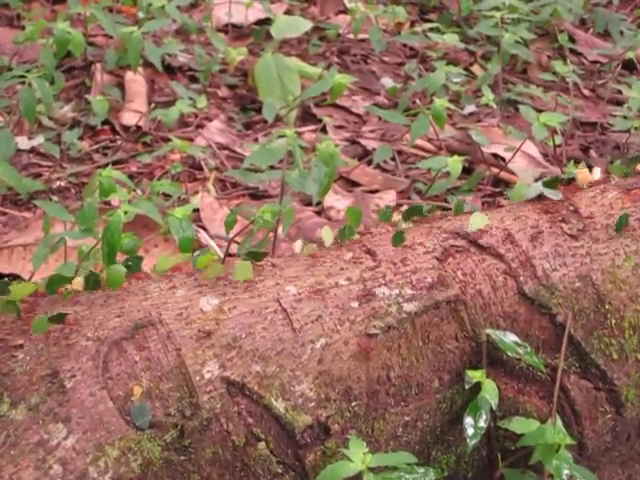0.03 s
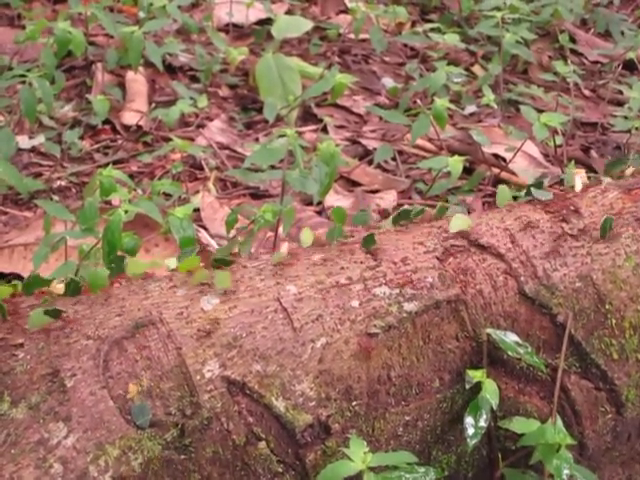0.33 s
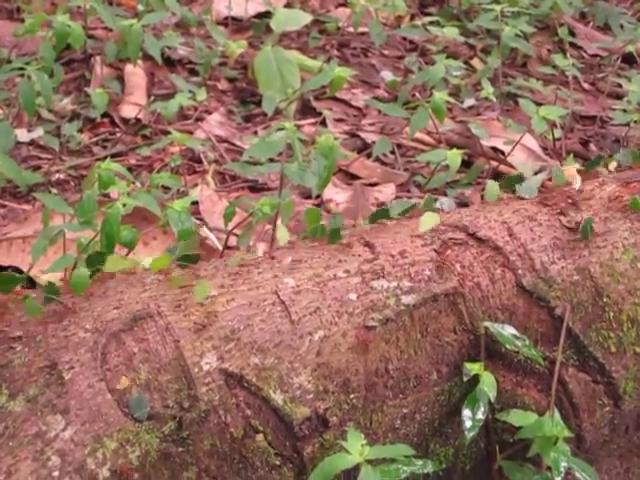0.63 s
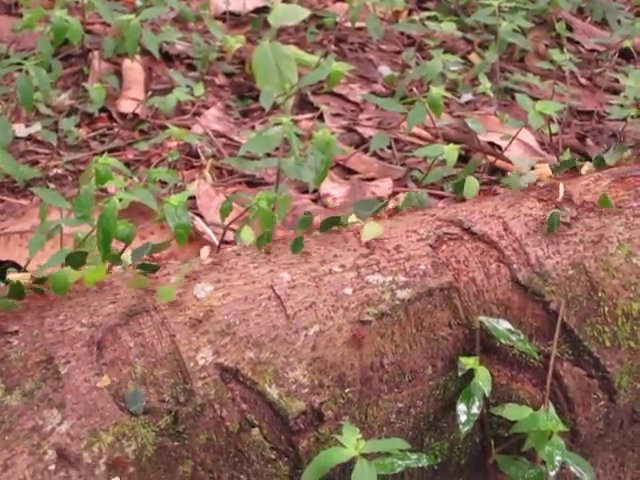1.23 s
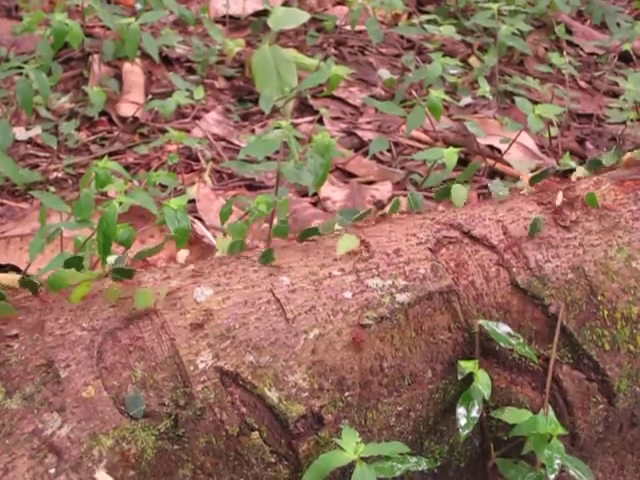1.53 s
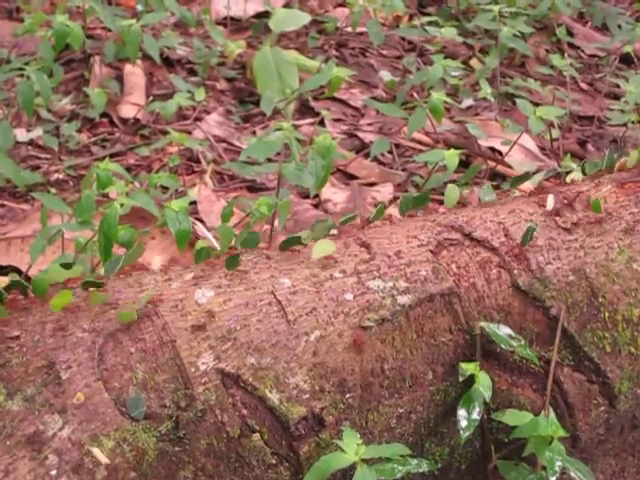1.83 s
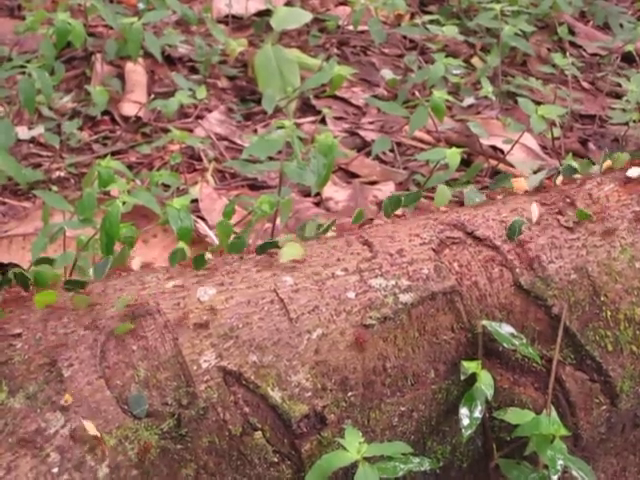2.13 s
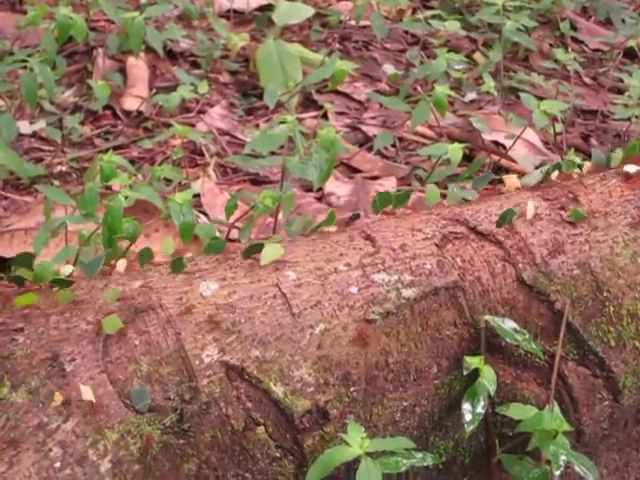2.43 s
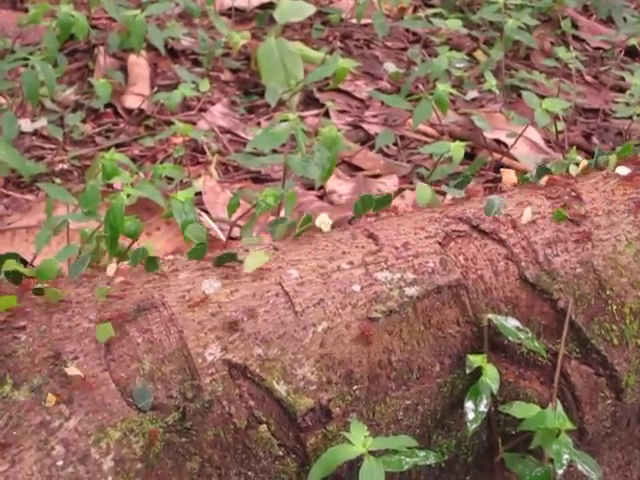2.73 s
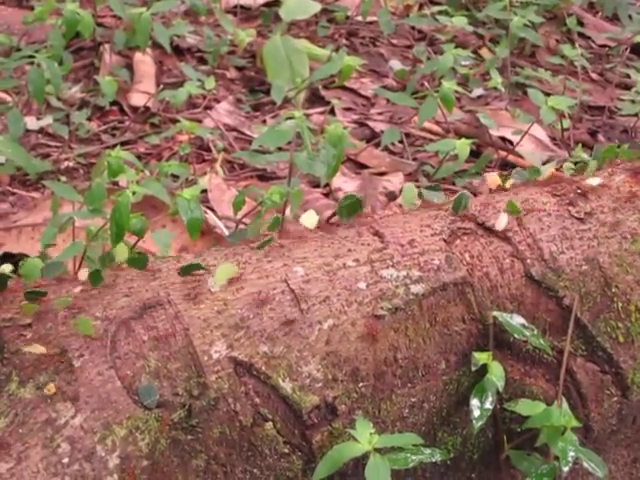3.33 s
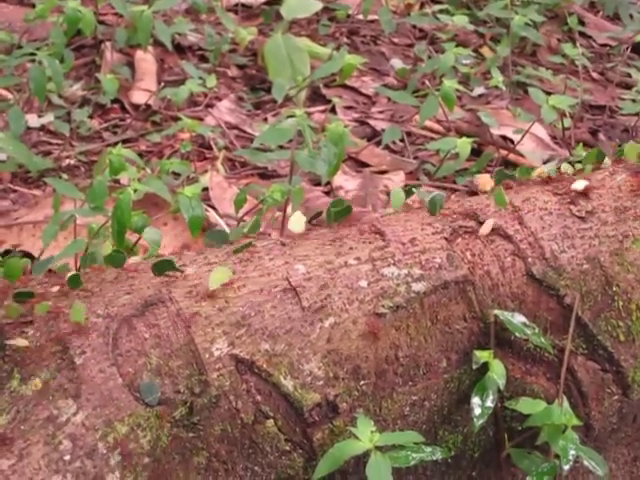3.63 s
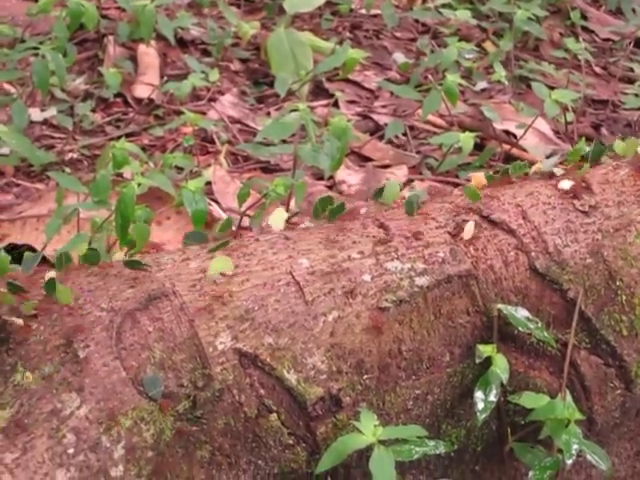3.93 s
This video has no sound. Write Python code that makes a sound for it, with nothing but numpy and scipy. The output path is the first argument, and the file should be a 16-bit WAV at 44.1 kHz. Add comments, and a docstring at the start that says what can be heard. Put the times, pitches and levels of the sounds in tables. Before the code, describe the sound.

A cricket trills three times over quiet forest hiss, and a fainter one answers.

```python
"""Crickets on a forest floor

A cricket trills three times in the leaf litter; each wing stroke is one short falling whistle.
A second cricket answers farther off, and a few tiny ticks come from the dry leaves. Behind them
lie soft forest hiss, far traffic, a distant motor, a low hum and a camera's faint high whine."""
import sys
import numpy as np
from scipy import signal
from scipy.fft import rfft, irfft
from scipy.io import wavfile

SR = 44100
rng = np.random.default_rng(int(sys.argv[2]) if len(sys.argv) > 2 else 0)


def transcribe(signal):
    """Save signal, clipped to [-1, 1], as a 16-bit WAV file at the path in sys.argv[1]."""
    frames = np.atleast_2d(signal).T
    limited = np.clip(frames, -1, 1)
    pcm = np.round(limited * 32767).astype(np.int16)
    wavfile.write(sys.argv[1], SR, pcm)


N = 176400
TIME = np.arange(N) / SR
FREQS = np.arange(N // 2 + 1) * SR / N


def from_db(db):
    """Turn decibels into a number to multiply by."""
    return 10 ** (np.asarray(db) / 20)

def rms_one(x):
    """Scale to an average strength (rms) of one."""
    return x / np.sqrt(np.mean(x ** 2) + 1e-20)

def in_time(rows):
    """Join a table's rows with straight lines, one curve per column after the time."""
    times, *columns = np.transpose(rows)
    return [np.interp(TIME, times, column) for column in columns]

def coloured_noise(spectrum):
    """Noise with its lows and highs set by a table."""
    hz, db = np.transpose(spectrum)
    curve_db = np.interp(np.log(np.maximum(FREQS, 1)), np.log(hz), db)
    gain = from_db(curve_db) * np.sqrt(SR / 2)
    return irfft(rfft(rng.standard_normal(N)) * gain, N)

def noise_around(centre_hz, width_hz):
    """Noise near one pitch; around zero it is a slow drift."""
    bell = np.exp(-.5 * ((FREQS - centre_hz) / width_hz) ** 2)
    return rms_one(irfft(rfft(rng.standard_normal(N)) * bell, N))

def band(x, edges_hz):
    """Keep only the sound between two frequencies."""
    return signal.sosfilt(signal.butter(4, edges_hz, "band", fs=SR, output="sos"), x + 1e-18)


# The hiss from low to high: f/Hz, level/dB per Hz
HISS_SPECTRUM = [(20, -87), (31, -73), (45, -80), (250, -78), (500, -80), (1000, -83.5), (2000, -88.5),
                 (3200, -92), (4800, -97.5), (5600, -100), (6400, -103), (7300, -104.3), (9000, -104.3),
                 (12000, -106.8), (15500, -110)]

def forest_air():
    """Even hiss and crickets blurred by distance, with a dip in the treble."""
    hiss = coloured_noise(HISS_SPECTRUM)
    chorus = from_db(-68.5) * noise_around(centre_hz=5420, width_hz=260)
    dip_hz, dip_width_hz = 6440, 1950
    dip = signal.iirnotch(dip_hz, dip_hz / dip_width_hz, fs=SR)
    return signal.lfilter(*dip, hiss + chorus)

def camera_whine(low_hz=7868, high_hz=12600, frames_per_s=29.97):
    """A camera gives off two thin tones; the lower one restarts with every frame."""
    frame_time = TIME % (1 / frames_per_s)
    low = band(np.sin(2 * np.pi * low_hz * frame_time), edges_hz=(7650, 8100))
    high = np.sin(2 * np.pi * high_hz * TIME)
    return from_db(-73) * rms_one(low) + from_db(-81) * rms_one(high)


# The rumble from low to high: f/Hz, relative level/dB
RUMBLE_SPECTRUM = [(45, -38), (68, -0.5), (82, 9), (92, 2), (103, 12), (120, 1.5), (136, 6), (156, 3),
                   (176, 2), (198, -0.5), (230, -37), (400, -41)]
# How loud the rumble is: t/s, level/dB
RUMBLE_LOUDNESS = [(0, -50), (.5, -50.5), (1.1, -52.5), (1.5, -51), (1.9, -48.5), (2.5, -52.5),
                   (3.1, -51.5), (4, -51.5)]

def road_rumble():
    """A distant road makes a deep noise that gently rises and falls."""
    db, = in_time(RUMBLE_LOUDNESS)
    return from_db(db) * rms_one(coloured_noise(RUMBLE_SPECTRUM))


# Traffic tones that swell and fade: loudest at t/s, half length/s, f/Hz, level/dB
TRAFFIC_TONES = [(0.898, 0.31, 333, -56.5), (1.27, 0.07, 331, -56.5), (2.052, 0.71, 200, -57.5),
                 (2.048, 0.28, 123, -55.5), (2.85, 0.41, 477, -61.5), (3.345, .3, 556, -60),
                 (3.952, 0.16, 287, -59.5)]
WAVER_DB, WAVER_HZ = 1.5, .75  # drift in level and pitch, for traffic and motor

def far_traffic():
    """Single wavering tones of far traffic come through the trees for a moment."""
    out = np.zeros(N)
    for peak_s, half_length, hz, db in TRAFFIC_TONES:
        cycles = np.cumsum(hz + WAVER_HZ * noise_around(0, 2.64)) / SR
        gain = from_db(db + WAVER_DB * noise_around(0, 2.6))
        swell = np.exp(-((TIME - peak_s) / half_length) ** 2)
        out += gain * swell * np.sin(2 * np.pi * cycles)
    return np.sqrt(2) * out


# How the hum changes: t/s, f/Hz, level/dB
HUM_CURVE = [(0, 109, -50), (.35, 106, -54.5), (.75, 103, -50.5), (1.5, 104, -58), (2.3, 101, -77),
             (2.8, 101, -53), (3.6, 101, -57), (4, 98, -58)]

def low_hum(waver_db=2):
    """One low tone slowly sinks, wavering on its way through the trees."""
    hz, db = in_time(HUM_CURVE)
    gain = from_db(db + waver_db * noise_around(0, 8.2))
    return np.sqrt(2) * gain * np.sin(2 * np.pi * np.cumsum(hz) / SR)


# How the motor's drone changes: t/s, f/Hz, level/dB
MOTOR_CURVE = [(0, 165, -74), (.13, 165.4, -63), (.19, 166, -46.5), (.9, 166.5, -48), (1.1, 166, -53),
               (1.33, 166.8, -48), (1.47, 165, -58.5), (1.7, 167.5, -45.5), (2.0, 168.5, -51),
               (2.25, 166, -52), (2.6, 156, -52), (3.5, 159, -52.5), (4, 157, -62)]
# The tones in the drone: multiple of the pitch, added level/dB
MOTOR_TONES = [(.5, -11.5), (1, -2), (1.5, -20), (2, -20)]

def distant_motor():
    """A motor drones with four low tones, each wavering on its way through the trees."""
    hz, db = in_time(MOTOR_CURVE)
    cycles = np.cumsum(hz + WAVER_HZ * noise_around(0, 3.7)) / SR
    out = np.zeros(N)
    for multiple, tone_db in MOTOR_TONES:
        gain = from_db(db + tone_db + WAVER_DB * noise_around(0, 3.1))
        out += gain * np.sin(2 * np.pi * multiple * cycles)
    return np.sqrt(2) * out


# Ticks in the dry leaves: t/s, snap level/dB, knock level/dB
LEAF_TICKS = [(.198, -38, -42), (.687, -40, -50), (1.0015, -46, -62), (1.423, -52, -63), (2.191, -44, -57),
              (3.1925, -37, -37), (3.8785, -53, -66)]

def leaf_ticks():
    """A dry leaf ticks with two bursts of noise: a bright snap and a duller, longer knock."""
    times, snap_db, knock_db = np.transpose(LEAF_TICKS)

    def bursts(levels, edges_hz, decay_s):
        fades = sum(from_db(db) * (TIME >= start) * np.exp(-np.abs(TIME - start) / decay_s)
                    for start, db in zip(times, levels))
        boost = np.sqrt(SR / 2 / (edges_hz[1] - edges_hz[0]))  # makes up for what the filter removes
        return boost * band(fades * rng.standard_normal(N), edges_hz)

    snaps = bursts(snap_db, edges_hz=(3530, 5600), decay_s=.00075)
    knocks = bursts(knock_db, edges_hz=(850, 1900), decay_s=.002)
    return snaps + knocks

def among_leaves(x, scatter_db, bounce_s=.005, bounce_db=-24, fade_s=.14):
    """Sound arrives directly, bounces off the ground and scatters from leaves and trunks."""
    t = TIME[:SR // 2]
    tail = rng.standard_normal(len(t)) * from_db(-60 * t / fade_s) * (t > bounce_s)
    scatter = signal.fftconvolve(x, tail / np.linalg.norm(tail))[:N]
    bounce = np.r_[np.zeros(int(bounce_s * SR)), x][:N]
    return x + from_db(bounce_db) * bounce + from_db(scatter_db) * scatter

def wing_strokes(trills, counts, pitch_hz):
    """Each stroke scrapes the wing's row of tiny teeth, making a falling whistle and a faint rasp."""
    rise_s, stop_s = .0039, .0018  # a gentle swell and an abrupt stop
    fall_hz_per_s, bend_hz_per_s2 = 135000, 7800000  # the pitch falls ever faster
    slowing_s = .000052  # each gap is this much longer than the last
    cold_db, cold_hz, warm_up_strokes = 4.5, 45.5, 1.3  # a trill starts softer and lower
    spread_db, spread_hz, rasp_spread_db = .2, 9, 5.5  # no two strokes are alike
    octave_db, rasp_db = -33.5, -34.5  # compared with the whistle
    whistle, scraping = np.zeros(N), np.zeros(N)
    for (start, db, spacing), count in zip(trills, counts):
        for k, (loud, sharp, phase, scrape) in enumerate(rng.standard_normal((count, 4))):
            peak_s = start + k * spacing + slowing_s * k * (k - 1) / 2
            span = np.abs(TIME - peak_s) < spacing
            t = TIME[span] - peak_s
            cold = np.exp(-k / warm_up_strokes)
            swell = np.exp(-np.where(t < 0, np.abs(t / rise_s) ** 1.82, np.abs(t / stop_s) ** 1.5))
            swell *= from_db(db - cold_db * cold + spread_db * loud)
            stroke_hz = pitch_hz - cold_hz * cold + spread_hz * sharp
            hz = stroke_hz - fall_hz_per_s * t - bend_hz_per_s2 * t * t
            angle = 2 * np.pi * (np.cumsum(hz) / SR + phase)
            whistle[span] += swell * (np.sin(angle) + from_db(octave_db) * np.sin(2 * angle))
            scraping[span] += swell * (1 - cold) * from_db(rasp_spread_db * scrape)
    rasp = rms_one(band(rng.standard_normal(N), edges_hz=(5540, 6960)))
    return whistle + from_db(rasp_db) * scraping * rasp


# The far cricket's trills: first stroke t/s, peak level/dB, first gap between strokes/s
ANSWERS = [(.2015, -55.5, .0222), (1.572, -58, .0224), (3.1525, -55.5, .0227)]
# Wing strokes in each answer: count
ANSWER_STROKES = [12, 12, 13]

def far_cricket():
    """A faint cricket farther off; more of its sound arrives scattered."""
    return among_leaves(wing_strokes(ANSWERS, ANSWER_STROKES, pitch_hz=5400), scatter_db=-10)


# The near cricket's trills: first stroke t/s, peak level/dB, first gap between strokes/s
CALLS = [(.4638, -34, .02177), (1.6507, -34, .02181), (2.884, -34, .02176)]
# Wing strokes in each call: count
CALL_STROKES = [13, 14, 14]

def near_cricket():
    """A cricket close by; nearly all of its sound arrives directly."""
    return among_leaves(wing_strokes(CALLS, CALL_STROKES, pitch_hz=5283), scatter_db=-27)

def scene():
    """Both crickets and the leaf ticks over the background, in one channel."""
    foreground = near_cricket() + far_cricket() + leaf_ticks()
    drone = distant_motor() + low_hum() + road_rumble() + far_traffic()
    return (foreground + drone + forest_air() + camera_whine())[None]

def record(dry, cutoff_hz=15700):
    """Cut away the very highest treble."""
    return signal.sosfilt(signal.ellip(14, .1, 70, cutoff_hz, fs=SR, output="sos"), dry)


dry = scene()
out = record(dry)
transcribe(out)
```